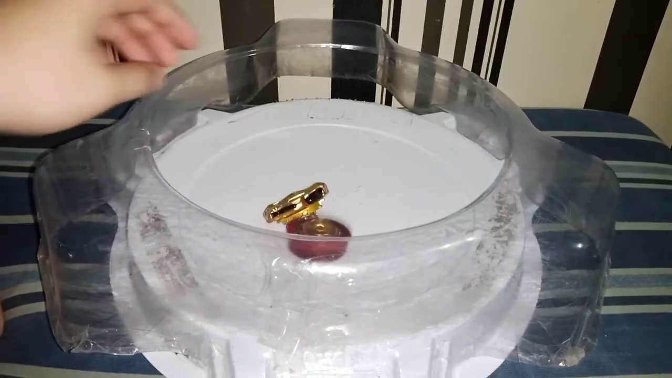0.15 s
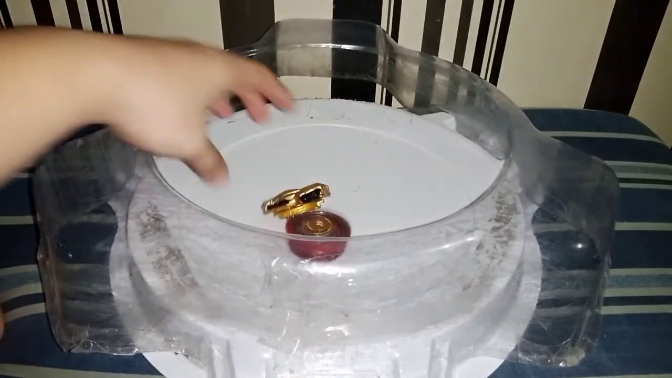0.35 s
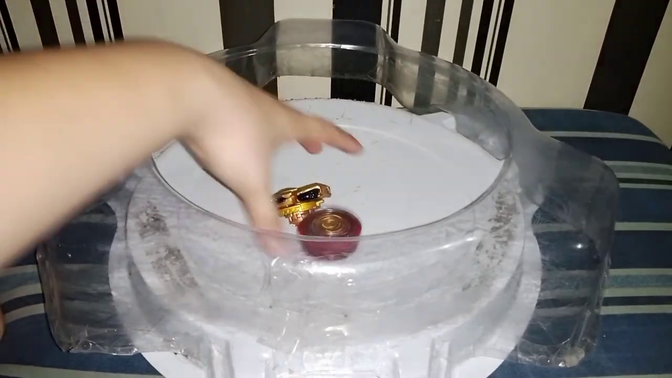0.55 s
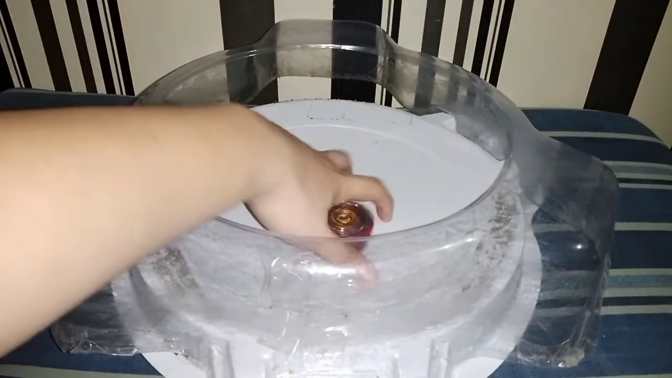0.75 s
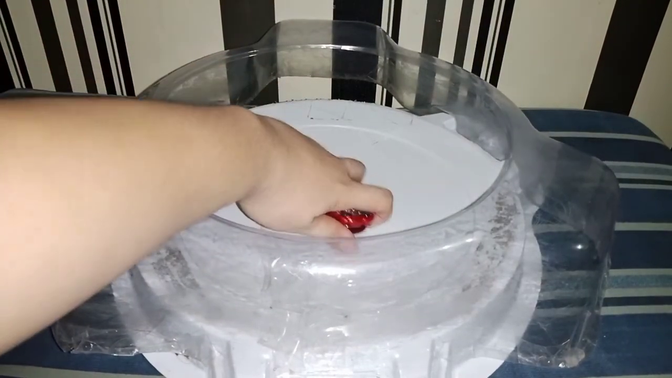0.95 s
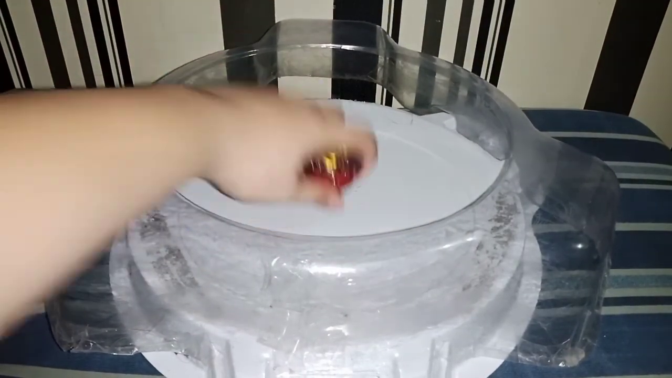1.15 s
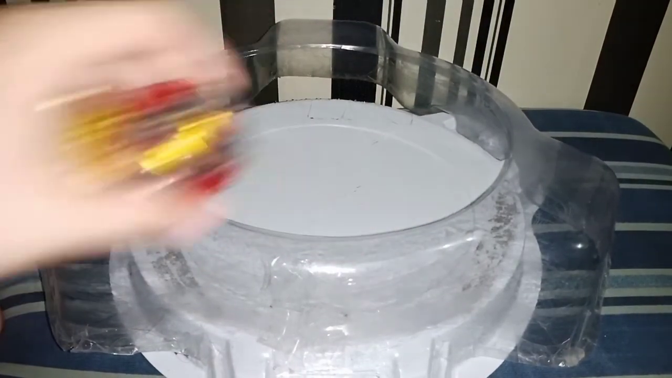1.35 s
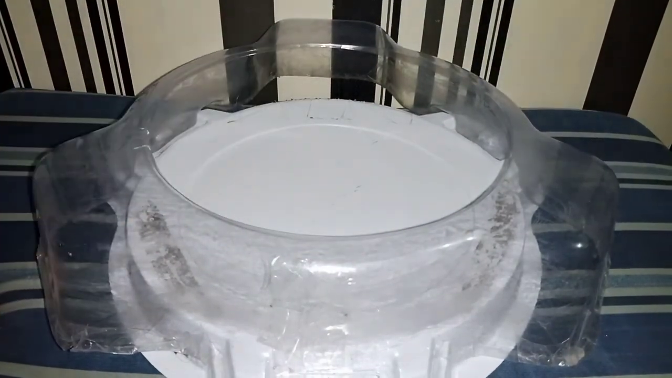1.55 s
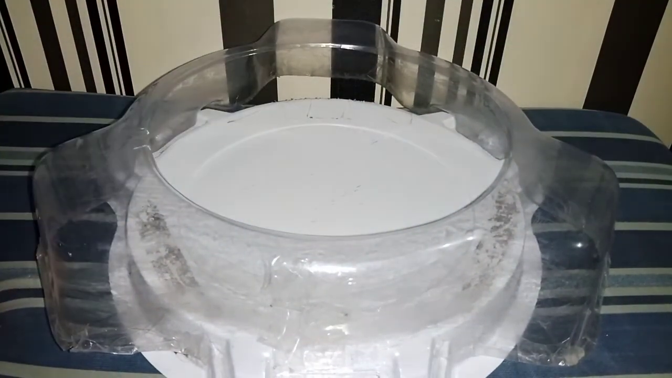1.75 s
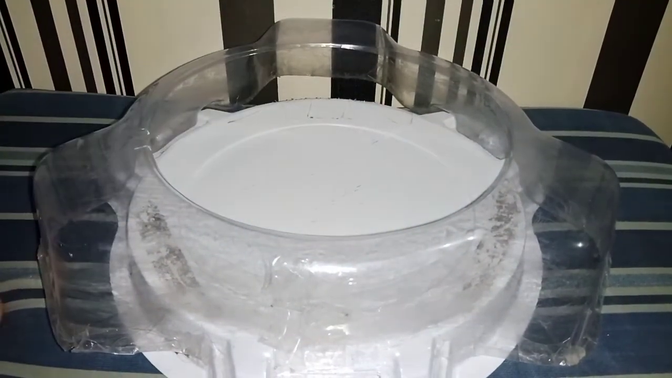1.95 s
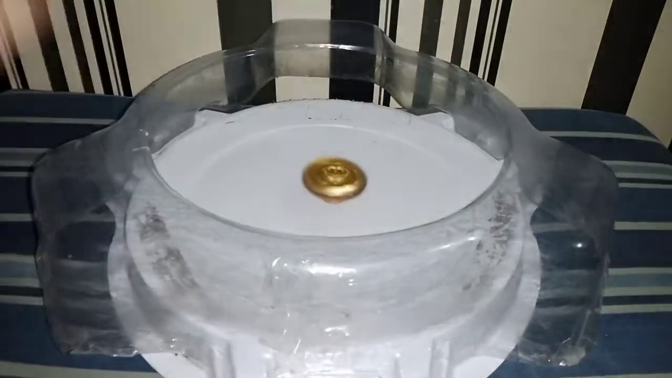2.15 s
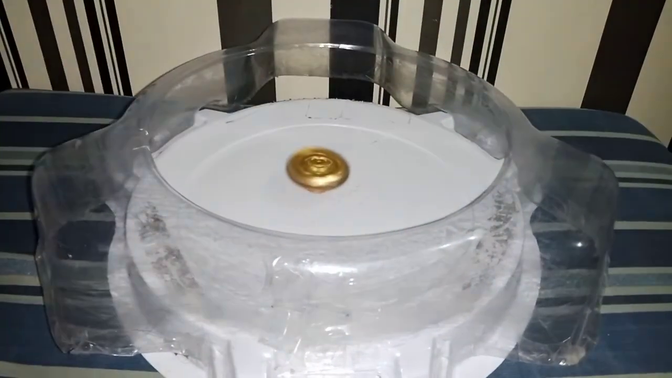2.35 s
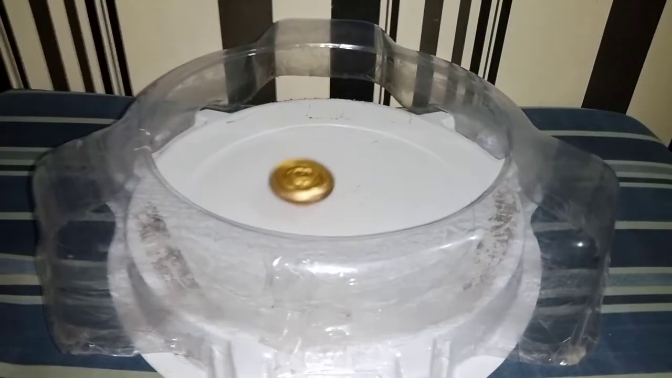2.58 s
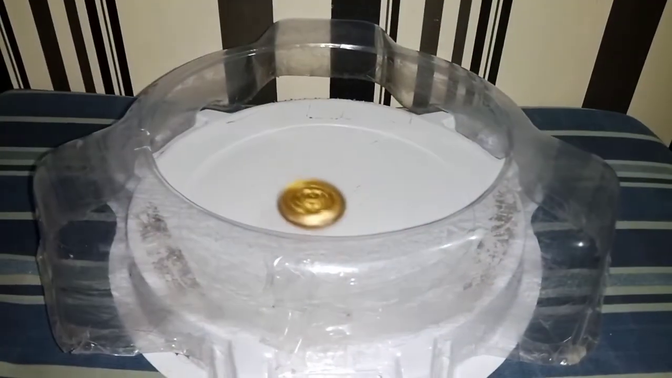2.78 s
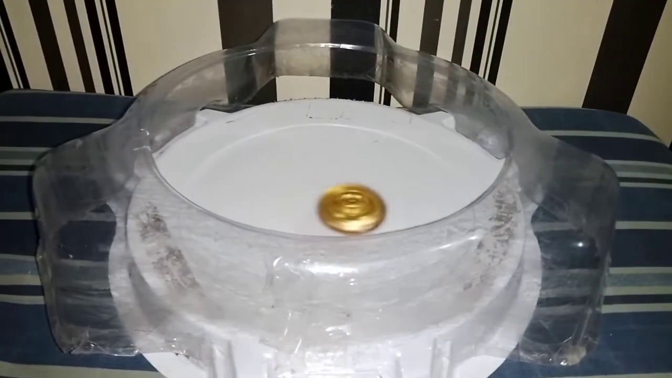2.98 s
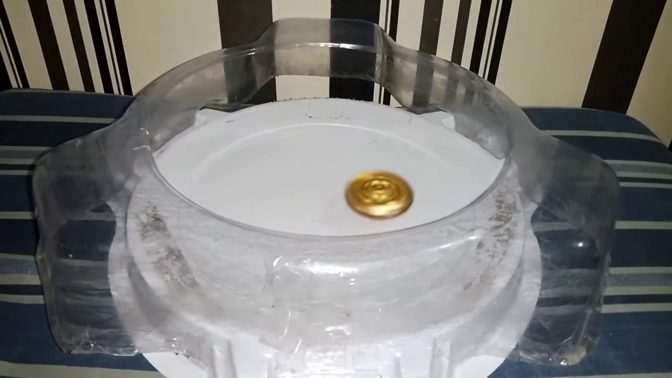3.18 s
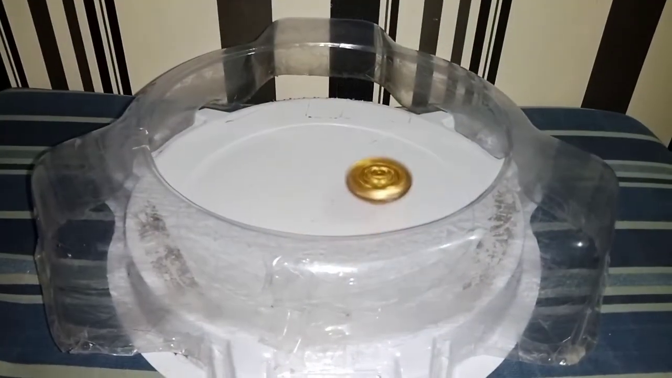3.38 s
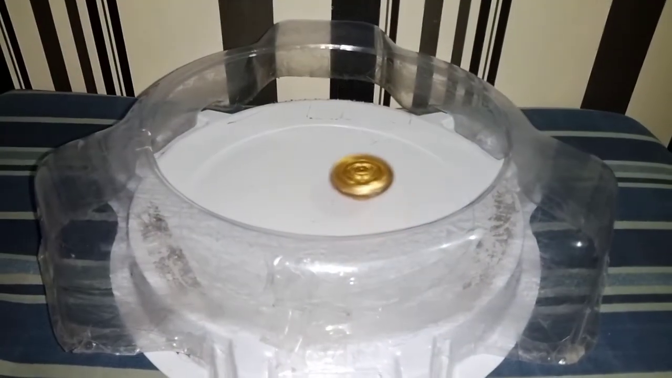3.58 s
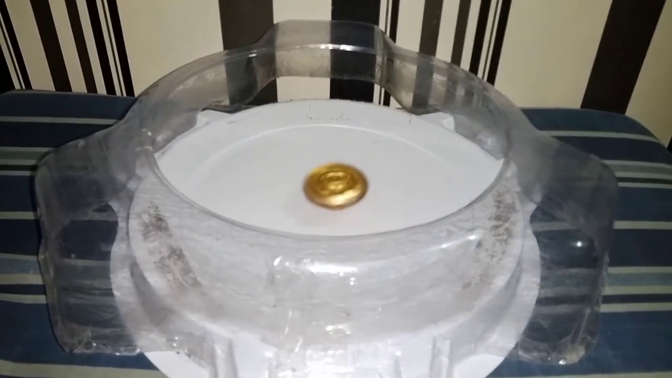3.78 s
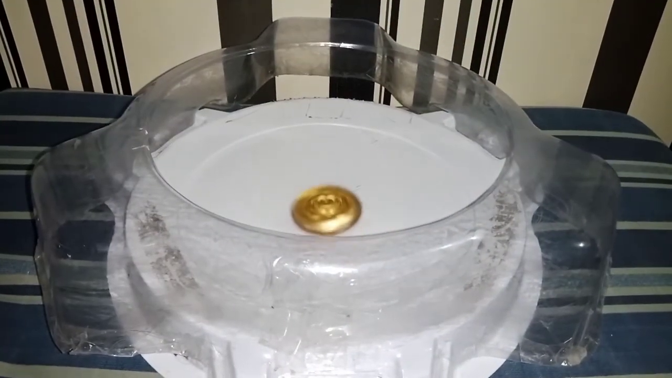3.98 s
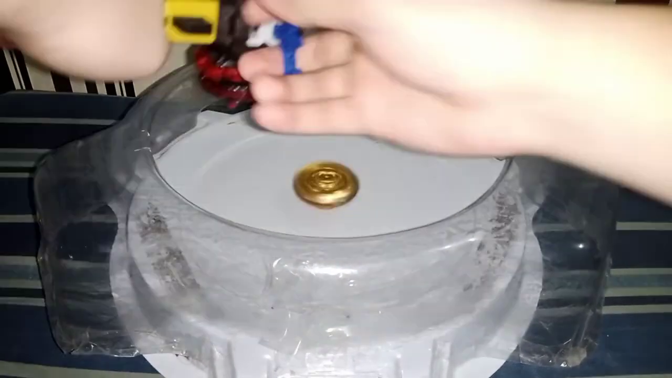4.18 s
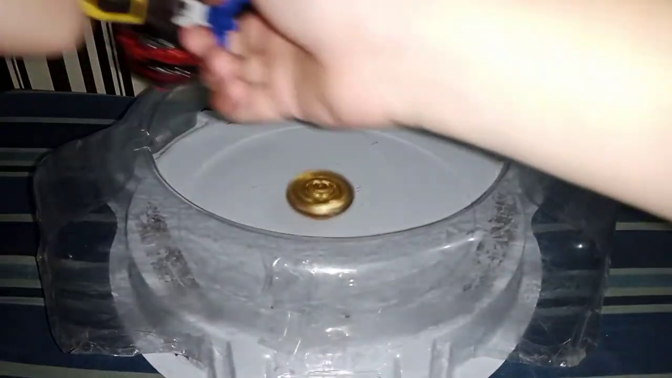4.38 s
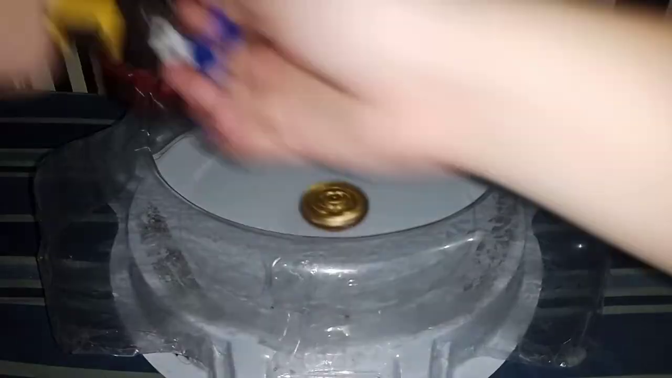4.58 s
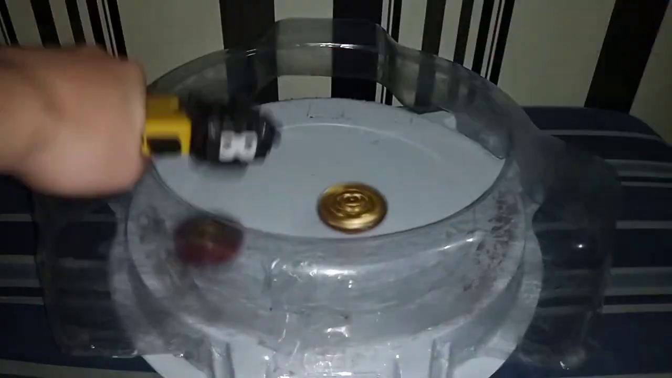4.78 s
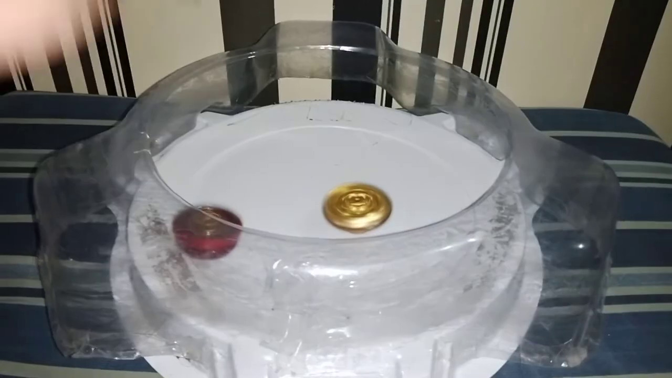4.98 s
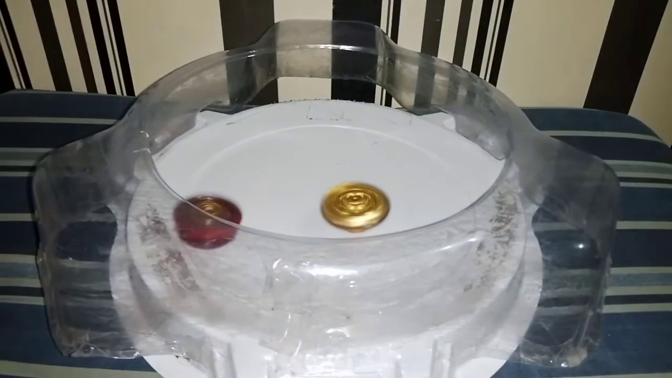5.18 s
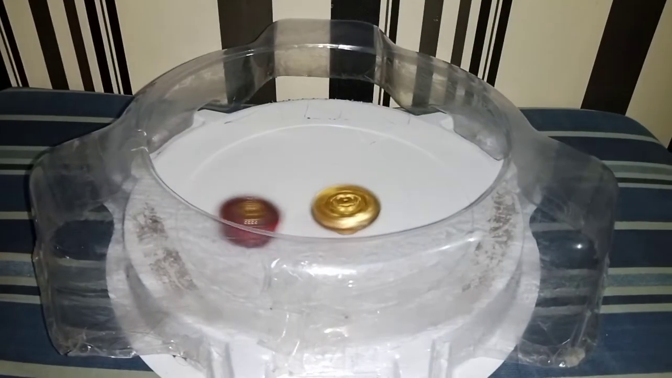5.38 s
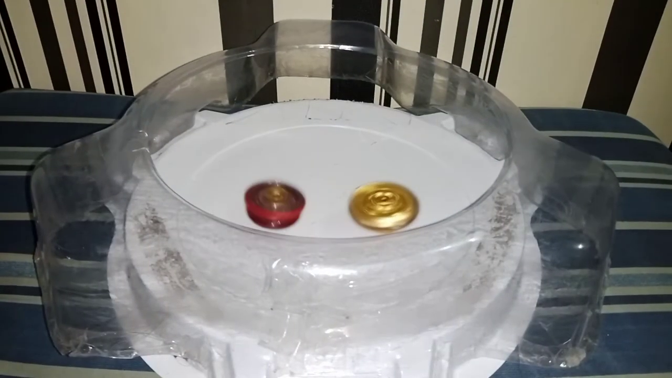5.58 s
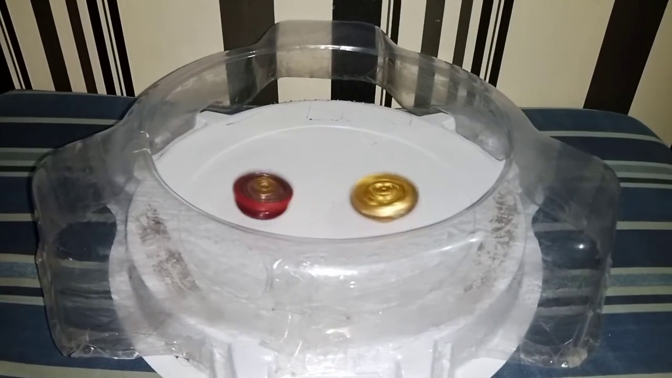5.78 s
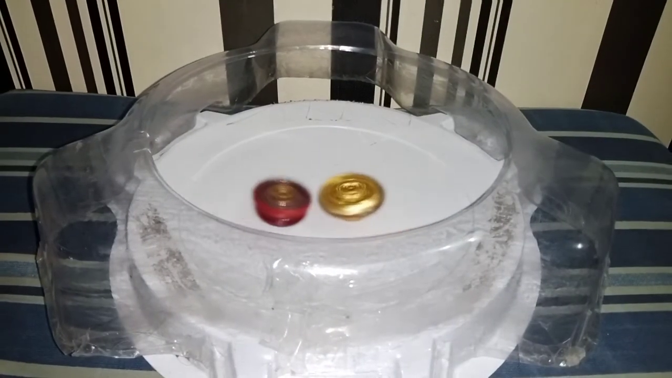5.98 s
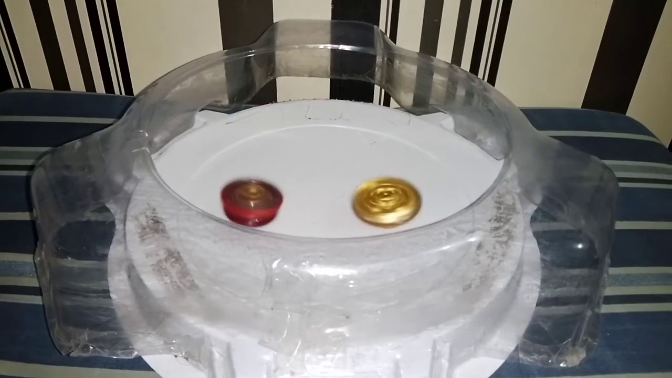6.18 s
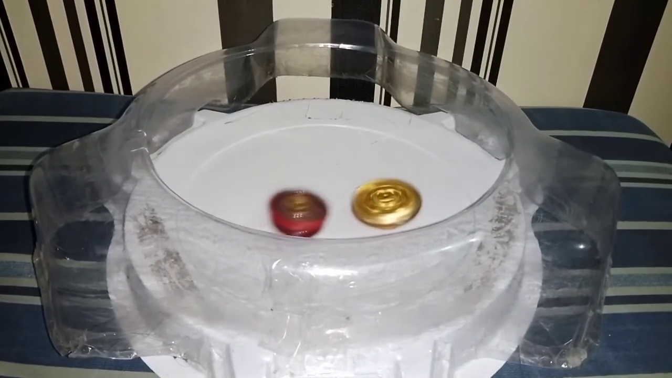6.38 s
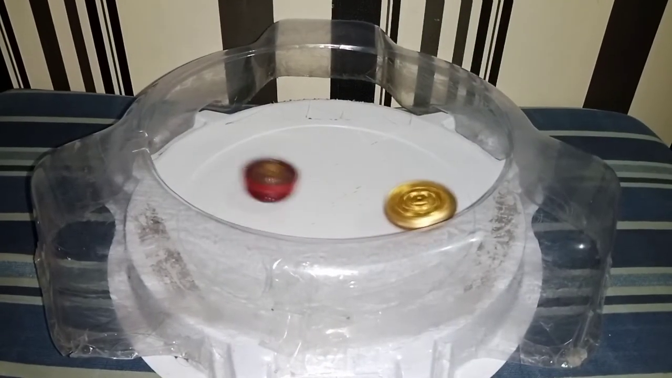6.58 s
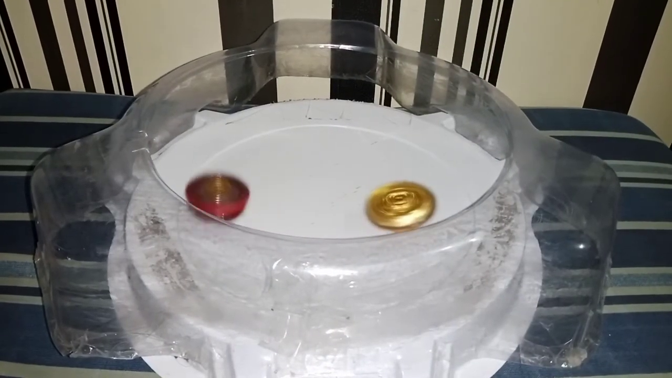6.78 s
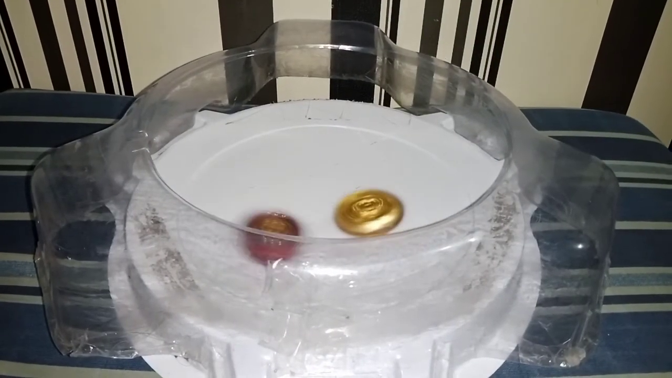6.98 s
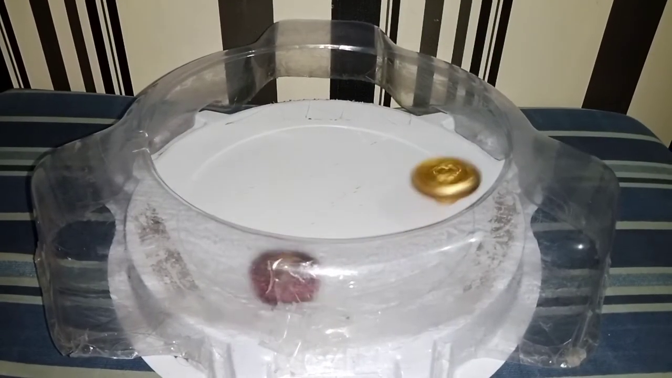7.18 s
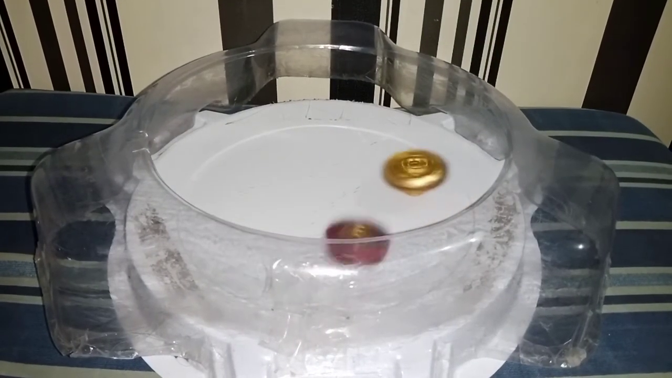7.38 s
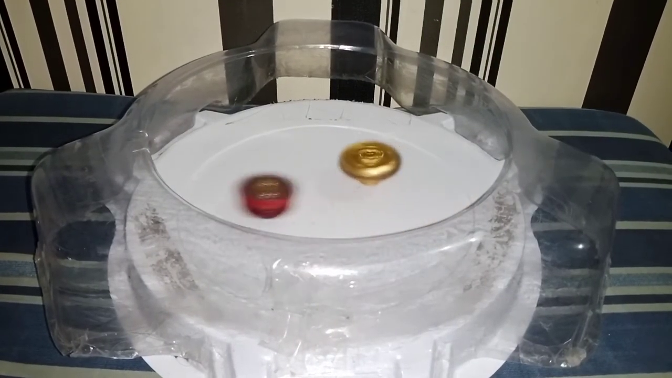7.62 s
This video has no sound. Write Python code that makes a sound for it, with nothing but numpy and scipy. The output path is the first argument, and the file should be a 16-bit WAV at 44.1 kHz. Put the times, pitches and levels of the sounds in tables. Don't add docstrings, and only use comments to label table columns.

```python
import sys
import numpy as np
from scipy import signal
from scipy.fft import rfft, irfft, next_fast_len
from scipy.io import wavfile
from scipy.ndimage import uniform_filter1d, map_coordinates

SR = 44100
rng = np.random.default_rng(int(sys.argv[2]) if len(sys.argv) > 2 else 0)


def inscribe(sig):
    pcm = np.round(np.clip(np.atleast_2d(sig).T, -1, 1) * 32767)
    wavfile.write(sys.argv[1], SR, pcm.astype(np.int16))


def level_to_linear(level):
    exponent = np.asarray(level, float) / 20
    return 10 ** exponent


N = 337365

# freq_hz, density_db
FAN_HISS = [(88, -18), (150, -17), (244, -3), (286, -13), (484, -6.5), (1260, -5), (1450, 0.5), (1980, -5),
            (2140, -6), (2810, -8.5), (3700, -17), (4950, -31), (7920, -37.5), (14800, -40), (16000, -26)]
# start_s, hold_s, level_db
LAUNCH_SWELLS = [
    (2.15, .06, -47.5),
    (4.89, .03, -46.5),
]
# freq_hz, density_db
MATTRESS_RUMBLE = [(15, -43.5), (25, -7.5), (62, 9), (124, 1), (156, -5.5), (215, -9.5), (287, -9.5),
                   (350, -40.5), (460, -63), (770, -120)]
# start_s, hold_s, level_db
WEIGHT_SHIFTS = [(0.0, 0.01, -42.5), (0.3, 0.12, -51), (0.45, 0.026, -56), (0.75, .04, -51),
                 (0.97, 0.054, -49.5), (1.78, .15, -44.5), (2.1, 0.11, -33), (2.58, 0.085, -52.5),
                 (3.17, 0.13, -62), (4.15, 0.19, -56.5), (4.6, 0.035, -59), (4.76, .03, -50.5),
                 (4.9, 0.043, -59.5), (5.65, .04, -49), (6.1, 0.18, -53), (6.68, 0.036, -50),
                 (7.18, 0.027, -41.5), (7.6, .06, -40)]
# delay_s, level_db
WALL_ECHOES = [(.0045, -18), (.0115, -12.5), (.016, -11), (0.023, -24), (0.032, -15)]
# freq_hz, t60_s
ROOM_DECAY = [(300, 0.32), (3000, 0.29), (8000, 0.26), (15000, .22)]
# start_s, peak_db, ring_hz, crack_db
GATHERING = [(0.067, -22, 3440, -24), (0.069, -35, 2100, -33), (0.0891, -43, 3150, -14),
             (0.1383, -38, 2100, -26), (0.1451, -26, 3400, -25), (0.1673, -40, 3220, -35),
             (0.3176, -42, 2100, -11), (0.3225, -27, 3560, -31), (0.325, -37, 1600, -32),
             (0.3494, -51, 3600, -34), (0.4317, -26, 3350, -22.5), (0.9669, -22.5, 3340, -22.5),
             (1.415, -41.5, 3220, -40)]
# start_s, peak_db, ring_hz, crack_db
RELOADING = [(1.8836, -34, 3500, -22), (1.917, -56, 2230, -1), (2.385, -30.5, 3550, -33),
             (2.3994, -35.5, 2650, -22), (2.552, -41.5, 3200, -36), (2.5797, -42, 2410, -29),
             (2.612, -25, 2600, -28), (2.6135, -33.5, 3560, -23), (2.6723, -42, 3040, -19),
             (2.8087, -41, 2680, -23), (2.828, -35.5, 3630, -19.5), (2.829, -58, 5700, -22),
             (2.9997, -42.5, 3950, -22), (3.2035, -39.5, 3100, -44), (3.3298, -41, 3400, -39),
             (3.3537, -34.5, 3330, -27), (3.481, -44, 3070, -38), (3.5359, -36, 3200, -32),
             (3.5375, -45.5, 5800, -30), (3.6326, -44, 1870, -27), (4.675, -45.5, 1800, -14),
             (5.2537, -37, 4200, -34), (5.454, -44, 3700, -32)]
# start_s, peak_db, ring_hz, crack_db, mode_spread_ratio
RELEASES = [
    (4.7282, -28.5, 2250, -7, 0.85),
    (4.7496, -19, 2830, -9.5, 1.1),
    (4.7606, -17, 3650, -14, 0.51),
    (4.764, -18, 1000, -38.5, 0.13),
    (4.795, -15.5, 3814, -19.5, 0.5),
    (4.8212, -7.5, 2290, -12.5, 1.3),
    (4.8788, -13.5, 2730, -16, 1.1),
    (4.9261, -15.5, 4100, -9.5, 1.1),
    (4.936, -9, 2580, -14, 0.77),
    (4.952, -17, 3400, -9.5, .9),
]
# start_s, peak_db, ring_hz, crack_db, mode_spread_ratio
RIM_CLASHES = [
    (5.5746, -18, 3100, -8.5, 0.95),
    (6.135, -15.5, 3190, -8.5, 0.45),
    (6.5825, -9, 3220, -19, 0.33),
    (6.5829, -10.5, 2900, -25, 0.28),
    (7.148, -13, 2400, -6.5, 0.2),
    (7.1488, -14, 3100, -7, 0.5),
    (7.5848, -15, 2350, -7.5, 0.25),
    (7.5856, -20, 3200, -13, 0.84),
]
# freq_ratio, level_db
RIM_MODES = [(0.659, -16.5), (0.841, -2.5), (0.949, 0), (1.0, 8.5), (1.099, -14.5), (1.22, -17.5)]
# freq_ratio, level_db
PART_MODES = [(0.698, -3), (0.9, 7), (1.0, 10), (1.15, 1.5), (1.8, -9), (2.751, -23)]
# freq_hz, density_db
PLASTIC_CRACK = [(710, -39.5), (1200, -13.5), (1570, -10), (2020, -14.5), (2250, -8.5), (3150, 0),
                 (4000, -10), (5590, -8), (7330, -14), (8720, -9.5), (13600, -13), (15000, -6.5),
                 (16000, -22.5)]
# freq_hz, width_hz, level_db
BOWL_MODES = [(347, 130, 2), (627, 84, 6.5), (1035, 340, -2), (1350, 180, -9)]
# start_s, hold_s, level_db
RING_RATTLES = [(0.07, 0.049, -49), (0.14, 0.04, -50.5), (0.325, 0.017, -44), (0.44, 0.0088, -68),
                (0.91, .045, -64), (0.975, 0.018, -43), (1.0, 0.083, -52), (2.39, 0.018, -55.5),
                (2.62, 0.063, -60), (3.21, 0.041, -63), (5.255, 0.034, -62.5), (7.2, 0.154, -65)]
# freq_hz, width_hz, level_db
LOOSE_RING_MODES = [(1600, 100, -4.5), (2100, 210, -4), (3100, 93, 4), (3400, 130, 4), (3505, 130, 5),
                    (5900, 1700, -12.5)]
# start_s, peak_db, boom_hz, slap_db, t60_s
BOWL_BUMPS = [(0.291, -43, 66.4, -38, 0.08), (0.427, -47, 120, -20, 0.12), (0.962, -49, 93, 6, 0.08),
              (1.768, -44.5, 141.6, -7, 0.092), (1.898, -35.5, 128, -40, 0.06),
              (1.995, -35, 127, -38, 0.095), (2.067, -41.5, 110, -1, 0.13), (2.115, -26, 95, -10.5, 0.042),
              (2.166, -22.5, 110, -6, 0.068), (2.239, -32, 64, -29, 0.08), (4.892, -9.5, 120.2, -2, 0.066),
              (4.923, -18, 129.5, -8.5, 0.078), (4.95, -24, 83.4, -18, 0.093),
              (5.012, -22.5, 102.4, -10, 0.095), (5.029, -33.5, 283.5, -12, 0.093),
              (5.066, -35.5, 242, -15, 0.075), (5.445, -34.5, 100.7, -37.5, 0.089),
              (5.574, -31, 115, 3, 0.077), (6.133, -33, 102.1, -38, 0.086), (6.584, -37, 150, 5, 0.04),
              (7.061, -51, 584, -14, 0.21), (7.149, -35.5, 95.4, 9, 0.087)]
# time_s, rasp_db, sizzle_db
CORD_PULLS = [
    [(2.05, -61, -28), (2.056, -70, 0), (2.07, -49, -5), (2.118, -35.5, -6.5), (2.158, -45.5, -1.5),
     (2.172, -38, -8), (2.28, -51.5, -20)],
    [(4.72, -60.5, -6), (4.726, -51.5, -15.5), (4.768, -17.5, -5.5), (4.836, -19, -14), (4.874, -39, 1.5),
     (4.885, -32, 3.5)],
    [(4.92, -40.5, -9), (4.926, -28.5, -9), (4.938, -17, -10), (5.0, -40.5, -2.5)],
]
# freq_hz, width_hz, level_db
SHELL_MODES = [(1024, 177.6, -14), (2015, 620, -0.5), (2530, 920, 1.5), (3200, 840, 1), (3840, 600, -2)]
# start_s, hold_s, hum_db
GOLD_TIP_LEANS = [(2.27, 0.29, -49.5), (2.663, 0.13, -58), (2.962, 0.63, -51), (3.667, 0.3, -62.5),
                  (4.012, 0.34, -51), (4.56, 0.03, -61), (5.017, 0.052, -35), (5.623, .08, -52.5),
                  (6.123, 0.21, -53), (6.696, .12, -55), (7.113, 0.23, -51), (7.575, 0.068, -52)]
# start_s, hold_s, hum_db
RED_TIP_LEANS = [
    (5.06, 0.012, -41.5),
    (5.45, .03, -54),
    (5.591, 0.045, -52.5),
    (5.75, 0.08, -62.5),
    (6.14, 0.066, -55),
    (6.27, .15, -66),
    (6.589, 0.18, -45),
    (7.08, 0.076, -46),
    (7.55, 0.15, -48),
]


def unit(x):
    return x / np.sqrt(np.mean(x ** 2) + 1e-20)


def along(points, hz):
    f, v = np.transpose(points)
    return np.interp(np.log(hz + 1), np.log(f + 1), v)


def curves(rows):
    s, *cols = np.transpose(rows)
    t = np.arange(N) / SR
    inside = np.clip(np.minimum(t - s[0], s[-1] + 0.0058 - t) / 0.0031, 0, 1)
    return inside, *[np.interp(t, s, c) for c in cols]


def swells(rows, rest_db, rise, fall):
    t = np.arange(0, N + 64, 32) / SR
    out = np.full(len(t), float(rest_db))
    for s, hold, db in rows:
        early, late = np.maximum(s - t, 0), np.maximum(t - s - hold, 0)
        out = np.maximum(out, db - rise * early - fall * late)
    return np.interp(np.arange(N) / SR, t, out)


def wobble(rate):
    knots = rng.standard_normal(int(N * rate / SR) + 4)
    return map_coordinates(knots, [np.arange(N) * rate / SR])


def filtered(x, response):
    m = next_fast_len(x.shape[-1] + 2048, True)
    return irfft(rfft(x, m) * response(np.fft.rfftfreq(m, 1 / SR)), m)[..., :x.shape[-1]]


def coloured(x, spectrum):
    return filtered(x, lambda hz: level_to_linear(along(spectrum, hz)))


def resonant(x, modes):
    def response(f):
        total = 0
        for k, (centre, width, db) in enumerate(modes):
            damping = 1j * f * width
            total = total + (-1) ** k * level_to_linear(db) * damping / (centre * centre - f * f + damping)
        return total
    return filtered(x, response)


def add(track, s, sound):
    part = track[round(s * SR):][:len(sound)]
    part += sound[:len(part)]


def background():
    z = signal.stft(rng.standard_normal(N), nperseg=512)[2]
    field = uniform_filter1d(uniform_filter1d(rng.standard_normal(z.shape), 5, 0), 12, 1)
    patchy = signal.istft(z * level_to_linear(1.7 * unit(field)), nperseg=512)[1][:N]
    hiss_db = swells(LAUNCH_SWELLS, rest_db=-55.5, rise=110, fall=90) + 0.5 * wobble(4.2)
    hiss = level_to_linear(hiss_db) * unit(coloured(patchy, FAN_HISS))
    rumble = unit(coloured(rng.standard_normal(N), MATTRESS_RUMBLE) * level_to_linear(1.82 * wobble(11)))
    rumble_db = swells(WEIGHT_SHIFTS, rest_db=-64, rise=190, fall=114) - 1.0
    return hiss + level_to_linear(rumble_db) * rumble


def room(x, wet_db, feed=None):
    hz, t, z = signal.stft(rng.standard_normal(SR // 3), SR, nperseg=256)
    tail = signal.istft(z * level_to_linear(-60 * t / along(ROOM_DECAY, hz)[:, None]), SR, nperseg=256)[1]
    tail *= np.clip(np.arange(len(tail)) / SR / 0.01, 0, 1) ** 2
    tail *= level_to_linear(wet_db) / np.linalg.norm(tail)
    out = signal.fftconvolve(x if feed is None else feed, tail)
    for s, db in [(0.000084, 0.00092)] + WALL_ECHOES:
        add(out, s, level_to_linear(db) * x)
    return out


def contacts(table, shape, ring_t60, knock_db, follows, ms, wet_db):
    out, t = np.zeros(N), np.arange(SR // 20) / SR
    blow = 1.0 * (np.arange(len(t)) == SR // 500)
    for s, db, hz, crack_db, *given_spread in table:
        spread = np.prod(given_spread)
        chatter = rng.standard_normal(len(t)) * np.exp(-(t / (ms * 0.0015)) ** 2)
        chatter *= np.clip(t / 0.00086, 0, 1)
        width = 3.47 / ring_t60 * spread ** 0.5
        modes = []
        for ratio, level in shape:
            mode_hz = hz * ratio ** spread * (1 + rng.normal(0, 0.018))
            modes.append((mode_hz, width, level + 1.5 * rng.normal()))
        taps = chatter * (rng.random(len(t)) < 0.03) + blow
        parts = [(lambda x: resonant(x, modes), taps, 0),
                 (lambda x: coloured(x, PLASTIC_CRACK), chatter, crack_db + 13),
                 (lambda x: resonant(x, BOWL_MODES), chatter, knock_db + follows * crack_db)]
        near, all_round = 0, 0
        for part, drive, part_db in parts:
            sound, even = part(np.array([drive, blow]))
            sound = sound * level_to_linear(part_db) / np.abs(sound).max()
            near = near + sound
            all_round = all_round + even * np.linalg.norm(sound) / np.linalg.norm(even)
        add(out, s - 0.0015, level_to_linear(db - 4.0) * room(near, wet_db, all_round))
    return out


def rattle():
    ticks = (rng.random(N) < 520 / SR) * level_to_linear(2.3 * rng.standard_normal(N))
    ticks = unit(ticks * np.sign(rng.standard_normal(N)))
    shaken = level_to_linear(swells(RING_RATTLES, rest_db=-110, rise=2500, fall=1800)) * ticks

    def scaled(part):
        return part(shaken) / np.std(part(ticks))

    ring = scaled(lambda x: resonant(x, LOOSE_RING_MODES))
    crack = scaled(lambda x: coloured(x, PLASTIC_CRACK))
    return room(ring + level_to_linear(-22) * crack, wet_db=-9)[:N]


def bumps():
    out, t = np.zeros(N), np.arange(SR // 4) / SR
    for s, db, hz, slap_db, t60 in BOWL_BUMPS:
        boom = -np.sin(2 * np.pi * hz * t) * level_to_linear(-60 * t / t60) * (1 - np.exp(-t / 0.0016))
        slap = resonant(rng.standard_normal(len(t)) * np.exp(-t / 0.023), BOWL_MODES)
        add(out, s, level_to_linear(db + 4.5) * (boom + level_to_linear(slap_db - 6) * slap / np.abs(slap).max()))
    return out


def cord():
    out = np.zeros(N)
    teeth_passed = np.cumsum(520 * level_to_linear(3 * wobble(90))) / SR
    teeth = np.diff(np.floor(teeth_passed), prepend=0) * level_to_linear(3.2 * rng.standard_normal(N))
    scrape = 0.042 * rng.standard_normal(N) * level_to_linear(5.19 * wobble(300))
    rasp = unit(resonant(teeth + scrape, SHELL_MODES))
    bright = coloured(0.5 * teeth + scrape, PLASTIC_CRACK)
    sizzle = unit(filtered(bright, lambda hz: 1 / (1 + (5200 / (hz + 1)) ** 6)))
    for pull in CORD_PULLS:
        inside, rasp_db, sizzle_db = curves(pull)
        out += inside * level_to_linear(rasp_db - 6.0) * (rasp + level_to_linear(sizzle_db) * sizzle)
    return room(out, wet_db=-6.5)[:N]


def spin(leans, lands, hz, friction, jolt, loss, skid_db, skid_grows):
    t = np.arange(N) / SR
    turns_hz = hz - friction * (t - lands) - loss * (t > jolt)
    turn = 2 * np.pi * np.cumsum(turns_hz) / SR + 0.21 * wobble(14)
    hum_db = swells(leans, rest_db=-73, rise=220, fall=257)
    skidding_db = hum_db + skid_db + skid_grows * (t - lands)
    hum = 0
    for k, db in enumerate((hum_db, skidding_db), 1):
        hum = hum + np.sqrt(2) * level_to_linear(db + 1.1 * wobble(18)) * np.sin(k * turn)
    return np.clip((t - lands) / 0.0086, 0, 1) * hum


def scene():
    hands = contacts(GATHERING, RIM_MODES, ring_t60=0.034, knock_db=-17.5, follows=0.21, ms=5.5, wet_db=-8.0)
    hands += contacts(RELOADING, PART_MODES, ring_t60=0.011, knock_db=-17.5, follows=0.2, ms=6.8, wet_db=-6.0)
    hands += contacts(RELEASES, RIM_MODES, ring_t60=0.013, knock_db=-14, follows=1.0, ms=4.3, wet_db=-2.0)
    tops = spin(GOLD_TIP_LEANS, lands=2.2, hz=95.2, friction=6.0, jolt=5.3, loss=13, skid_db=-28, skid_grows=0)
    tops += spin(RED_TIP_LEANS, lands=5.03, hz=120.5, friction=10.8, jolt=6.14, loss=0.3,
                 skid_db=-9, skid_grows=1.1)
    tops += contacts(RIM_CLASHES, RIM_MODES, ring_t60=0.014, knock_db=-17.5, follows=0.55, ms=4.58, wet_db=-2.5)
    return (background() + hands + rattle() + bumps() + cord() + tops)[None]


def low_pass(x):
    return signal.sosfilt(signal.butter(12, 16800, fs=SR, output="sos"), x)


def record(dry):
    def microphone(hz):
        treble_db = -24 * np.clip((hz - 15800) / 300 + 0.5, 0, 1)
        return level_to_linear(treble_db) / (1 + (48.6 / (hz + 1)) ** 4)
    mix = filtered(dry[0], microphone)[None]
    return low_pass(mix)


dry = scene()
out = record(dry)
inscribe(out)
```